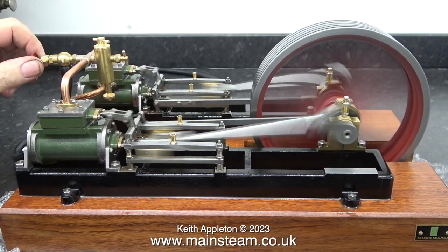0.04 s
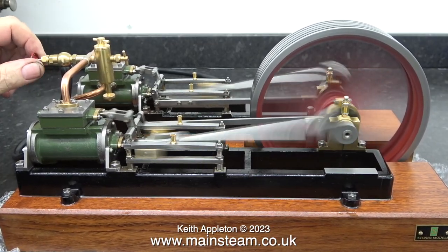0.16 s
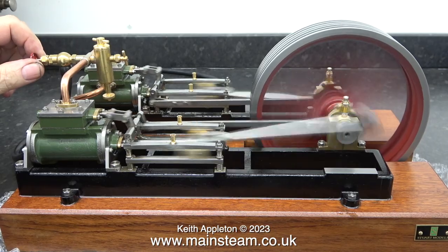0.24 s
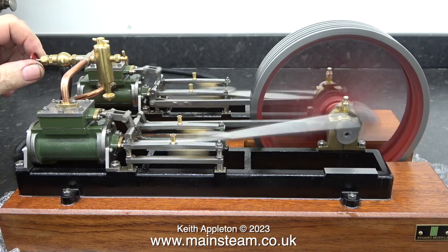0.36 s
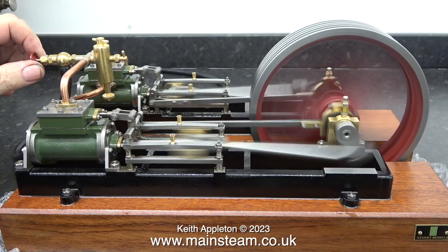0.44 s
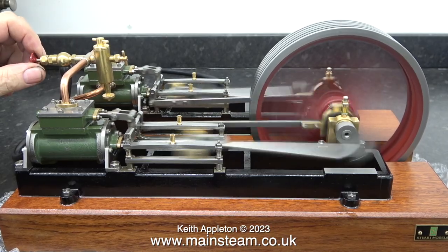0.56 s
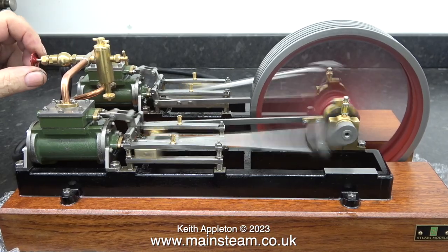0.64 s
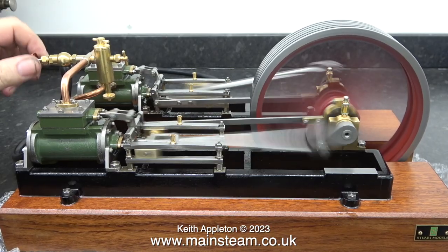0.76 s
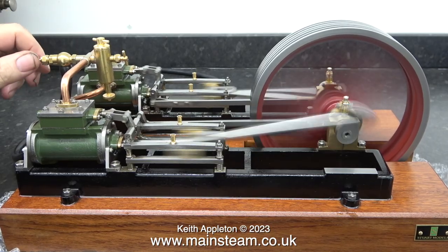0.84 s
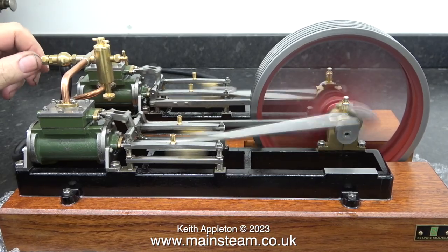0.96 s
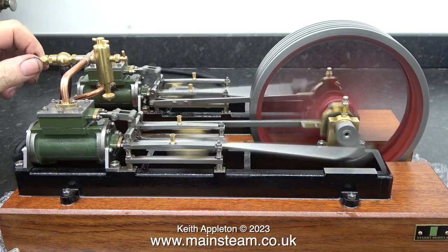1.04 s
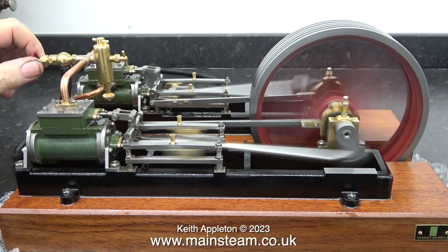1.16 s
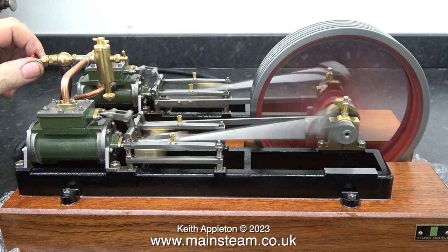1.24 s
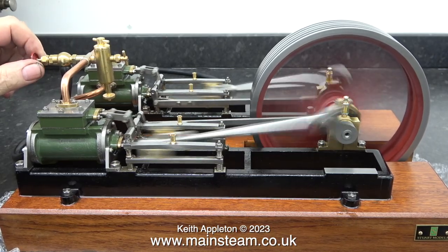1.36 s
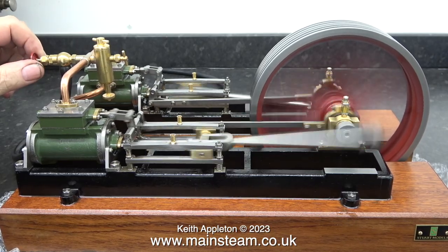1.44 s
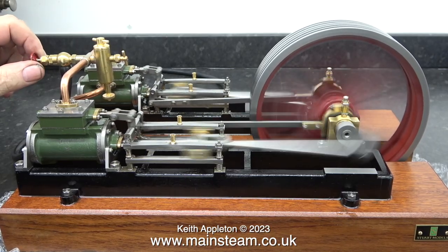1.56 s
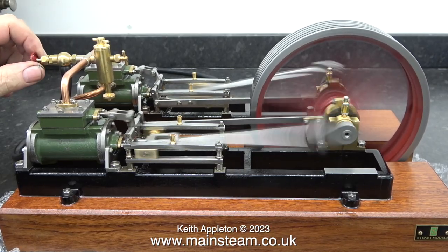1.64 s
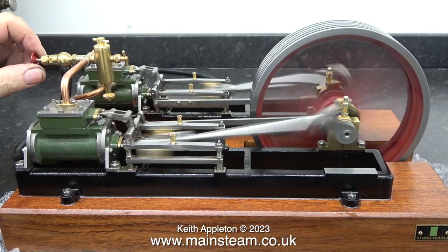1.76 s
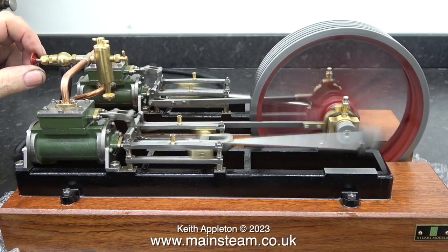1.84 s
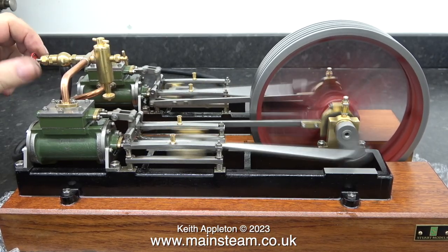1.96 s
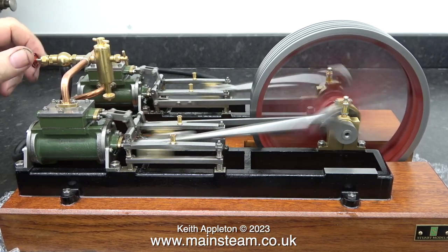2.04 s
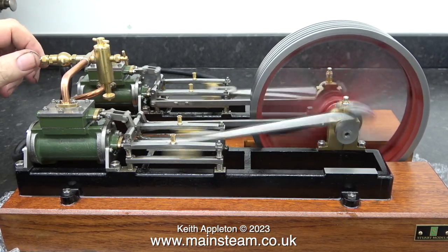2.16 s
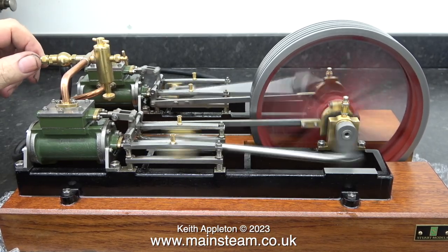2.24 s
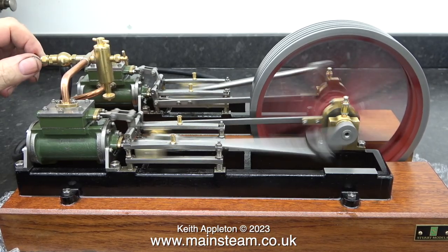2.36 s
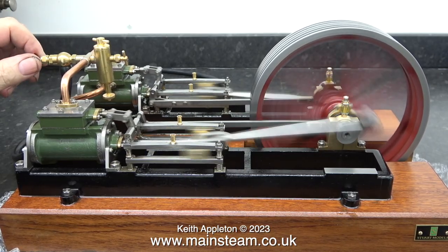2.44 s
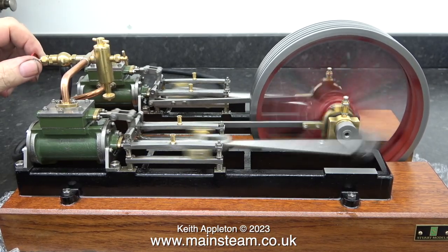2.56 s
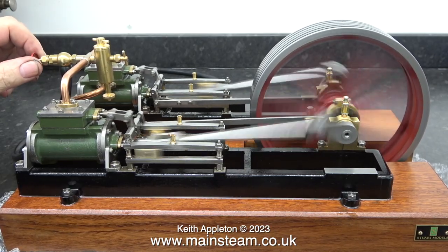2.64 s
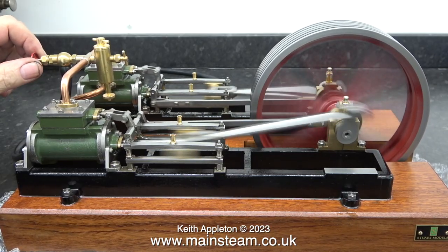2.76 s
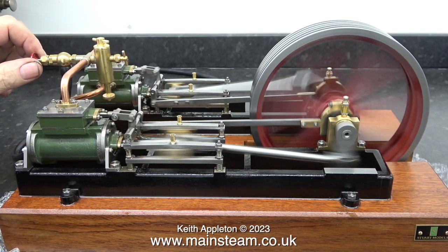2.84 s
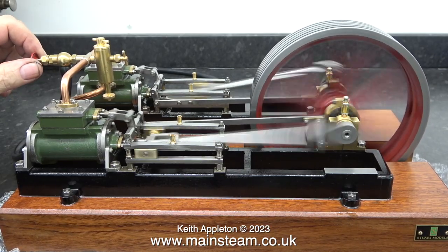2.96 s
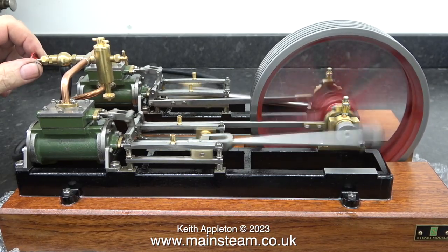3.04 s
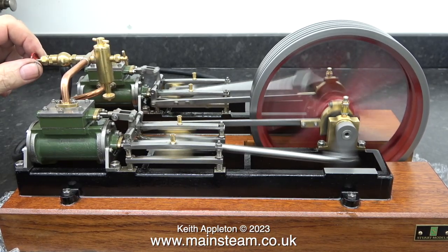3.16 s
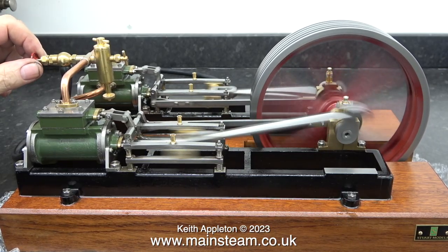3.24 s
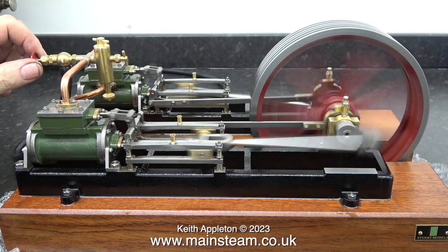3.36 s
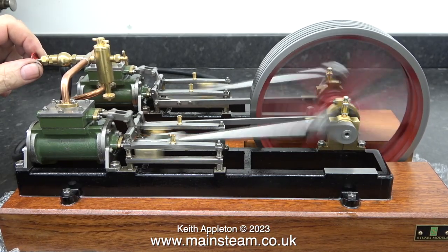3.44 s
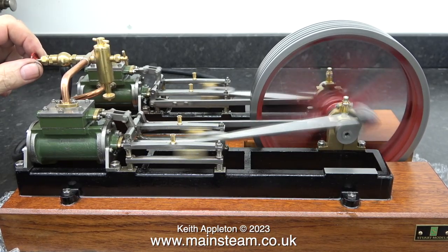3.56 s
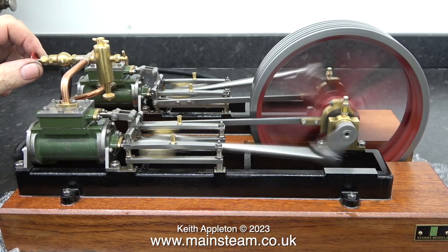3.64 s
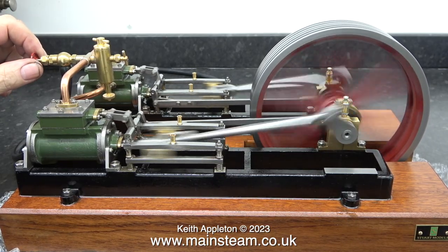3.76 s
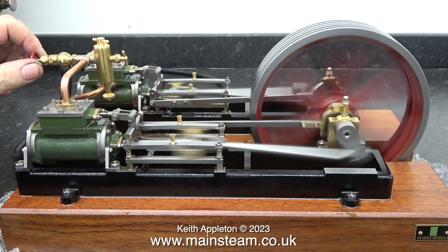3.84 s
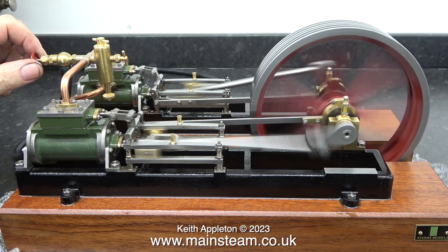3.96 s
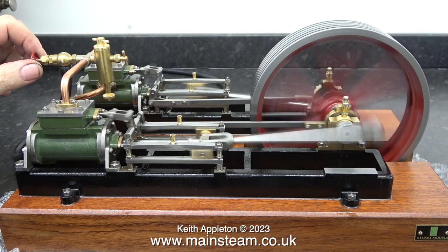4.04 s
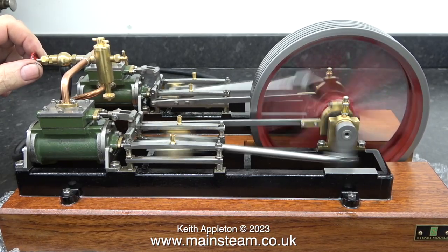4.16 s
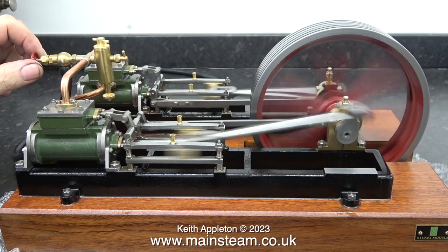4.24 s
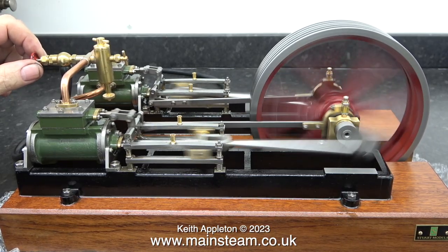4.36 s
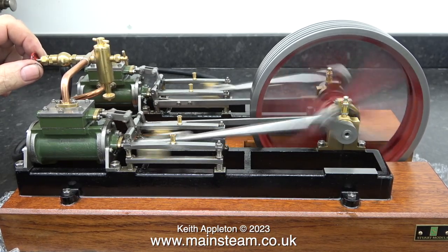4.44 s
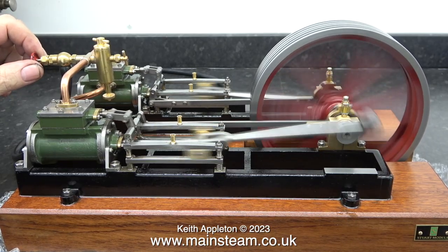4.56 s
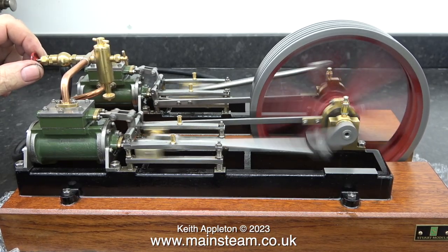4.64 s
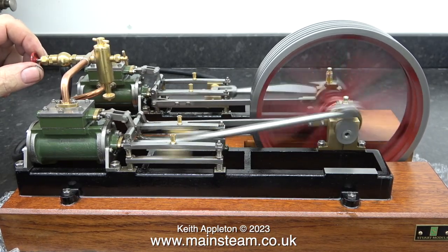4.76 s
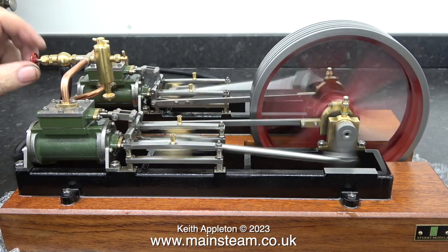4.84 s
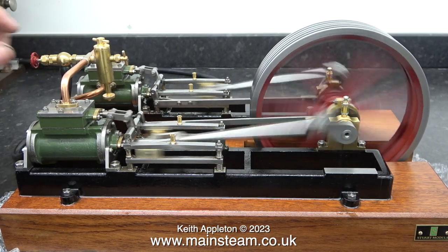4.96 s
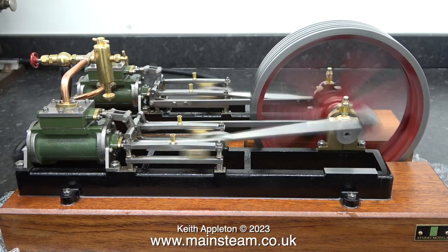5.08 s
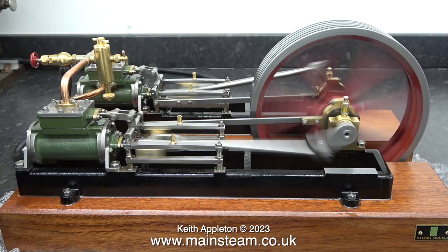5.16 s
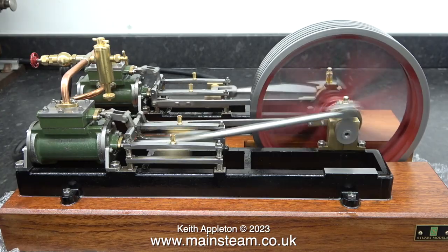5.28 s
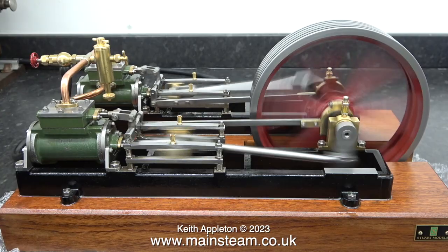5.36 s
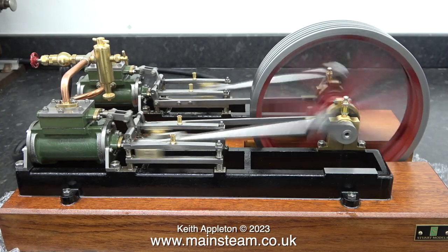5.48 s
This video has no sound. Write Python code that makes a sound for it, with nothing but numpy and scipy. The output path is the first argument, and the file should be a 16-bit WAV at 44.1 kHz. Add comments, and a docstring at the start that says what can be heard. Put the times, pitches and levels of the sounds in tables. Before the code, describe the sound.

A small twin-cylinder model engine clatters fast and metallic, bright clacks and ticks over air hiss and a low bench boom, gradually slowing.

```python
"""On a padded bench, a small twin-cylinder engine runs on compressed air and slows as the valve is closed.
Four piston reversals a turn each set off noise-like contacts for a clack, a tick and a knock; loose links
rattle and air hisses in between, ringing the same metal parts as resonant filters.
The wooden base rings from blows and rattle, the bench booms along with the shaft over a soft rumble,
and short blurred reflections come back from bench and wall."""
import sys
import numpy as np
from scipy import signal
from scipy.fft import rfft, irfft, next_fast_len
from scipy.io import wavfile
from scipy.ndimage import uniform_filter1d

SR = 44100
rng = np.random.default_rng(int(sys.argv[2]) if len(sys.argv) > 2 else 0)


def wrap_up_sound(samples):
    """Save the sound to the file named by the first command line argument, as 16-bit audio."""
    columns = np.atleast_2d(samples).T
    # keep every value between -1 and 1, then stretch to whole-number steps
    tamed = np.clip(columns, -1, 1)
    steps = np.round(tamed * 32767).astype(np.int16)
    wavfile.write(sys.argv[1], SR, steps)


def linear_from_db(decibels):
    """Turn decibels (scalar or array-like) into linear amplitude factors; 0 gives 1."""
    return 10 ** (np.asarray(decibels, float) / 20)


N = 242991
TIME = np.arange(N) / SR

# shaft speed as the valve is closed: (time [s], speed [rev/min])
SHAFT_SPEED = [(0, 526.3), (.6, 506.7), (1.2, 482.7), (1.8, 435.8), (2.4, 407.0), (3, 376.0), (3.4, 362.2),
               (4, 357.7), (4.6, 352.4), (5.51, 344.0)]
# shaft angle of the four stroke ends: (angle [turns])
END_TURNS = np.array([.21, .45, .71, .935])
# play in the joints shifts the blow at each end: (delay [ms])
PLAY_MS = [-0.69, -0.65, 0.46, 0.79]
PLAY_SPREAD_MS = 0.58  # the shift is never quite alike
# relative strength of the four ends at SLOW_RPM, before the layer gains:
# (clack [dB], ring [dB], low knock [dB], high knock [dB])
SLOW_RPM = 350
BLOW_DB = [(-43, -42, -47, -49), (-24, -29.5, -43.5, -38), (-22, -27.5, -48, -35.5),
           (-28, -32, -34.5, -40.5)]
# growth of those strengths with speed, same columns: (each [dB per 100 rev/min])
GROWTH_DB = [(11.3, 8.56, 4.5, 8.8), (3.5, 1.7, 4, 2.3), (3.67, 3.4, 4.5, 1.7), (3, 3.1, -3, 2.9)]
# random spread of those strengths, skewed towards weak blows, same columns: (each [dB])
MISS_DB = (1.1, 1.97, 2.2, 2.7)
# contacts around the four stroke ends, in turn order: (lead [ms], rise [ms], decay [ms],
# after-rattle share [dB], after-rattle decay [ms], tick pitch [Hz], tick against clack strength [dB])
STROKE_ENDS = [(5.3, 44, 11, 10, 42, 14000, -16), (0.67, 4.8, 4.1, -15, 31, 14000, -8),
               (0.69, 3.8, 4.5, -9, 22, 13760, -5), (1.1, 6.2, 8.2, -4, 38, 13600, -4)]
# running rattle between reversals, before the layer gain: (time [s], level [dB])
RUNNING_RATTLE = [(0.0, -26), (0.74, -30), (1.09, -29), (2.07, -30.5), (2.38, -30), (3.08, -31),
                  (3.93, -31), (4.25, -31.5), (5.51, -31.5)]
# rods, guides and pipes, each a cluster of close modes: (frequency [Hz], width [Hz], relative level [dB])
METAL_PARTS = [(2547, 97, -2.5), (2795, 333, -8.5), (2423, 140, -13.5), (3370, 86, -16.5), (4025, 15, -6.5),
               (4206, 284, -4.5), (4390, 230, -9), (4890, 150, -16), (5177, 246, -8.5), (6276, 157, -1.5),
               (6614, 110, -8.5), (7120, 42, -16), (7786, 300, -8), (8150, 80, -5.5), (8500, 110, -10.5),
               (9040, 140, -8.5), (9740, 220, -8.5), (10220, 210, -9), (12160, 870, -18), (12070, 360, -9),
               (14350, 320, -15), (13840, 340, -13.5), (15800, 320, -19)]
# places of the narrow modes in a cluster: (offset [widths])
CLOSE_MODES = (-.55, -.1, .4)
# air hiss under the resonances: (frequency [Hz], gain [dB])
AIR_HISS = [(600, -52), (1000, -19.5), (1500, -12.5), (2100, -16.5), (3200, -16), (5700, -11.5),
            (9000, -21), (11100, -52), (13000, -15.5), (15900, -28)]
# frame and wooden base modes: (frequency [Hz], t60 [s], lead [ms], drive by a knock [dB],
# drive by the running rattle [dB])
BASE_MODES = [(228, 0.061, 3.3, -10, -52), (335, 0.04, 2.5, -5, -45), (387.7, 0.045, 6.97, 0.5, -42.5),
              (467, 0.035, 2.4, -5.5, -40.5), (569, 0.051, 4.02, -6, -52.5), (709, 0.03, 4.94, -4, -40),
              (775, 0.032, 5.51, 1.5, -43), (1190, 0.012, 5.46, 3, -33), (1294, 0.026, 4.94, -7, -40.5)]
# bench modes: (frequency [Hz], t60 [s], then for each of the four ends lag [ms], signed push [ratio])
BENCH_MODES = [(66.7, .25, -14.0, .12, -1.25, .165, -.12, .17, -.8, .11),
               (125, .055, -4.0, .42, 3.0, .1, -3.0, .08, 4.0, .06),
               (165, .05, -8.0, .14, 3.0, .06, -3.0, .06, 2.0, -.26)]
# colour of the room and bench rumble: (frequency [Hz], gain [dB])
RUMBLE_COLOUR = [(25, -30), (50, -18), (110, -17), (200, -13), (400, -2), (900, -21)]
# scattered part, opposite in the two channels: (frequency [Hz], gain [dB])
APART_COLOUR = [(60, -34), (1000, -26), (5000, -30), (7000, -19), (9000, -11), (10500, -6), (11800, -10),
                (13000, -26)]
# share that the wall behind sends back; the padding swallows the low part: (frequency [Hz], gain [dB])
WALL_COLOUR = [(60, -30), (500, -20), (1500, -9), (16000, -9)]
# microphone's loss of deep bass: (frequency [Hz], gain [dB])
BASS_CUT = [(20, -34), (30, -22), (45, -4), (60, 0), (20000, 0)]
# tilt between the sides: (frequency [Hz], left minus right [dB])
SIDE_BALANCE = [(60, -5), (110, -2), (200, 3.5), (380, 3), (700, 6), (1290, 5.5), (2380, 3), (4400, 4),
                (8120, 2), (11000, 2.2), (15000, 1)]


def unit(x):
    """Scales a signal to rms 1."""
    return x / np.sqrt(np.mean(x ** 2))


def colour(x, points):
    """Equaliser whose gain runs through (frequency [Hz], gain [dB]) points on a log frequency axis."""
    hz, db = np.transpose(points)
    size = next_fast_len(N)
    log_hz = np.log(np.maximum(np.fft.rfftfreq(size, 1 / SR), 1))
    gain = linear_from_db(np.interp(log_hz, np.log(np.maximum(hz, 1)), db))
    return irfft(rfft(x, size) * gain, size)[:N]


def ring(x, hz, t60):
    """One decaying mode; a unit blow rings with a peak near 1."""
    w = 2 * np.pi * min(hz, .45 * SR) / SR
    r = np.exp(-np.log(1000) / (t60 * SR))
    return signal.lfilter([np.sin(w)], [1, -2 * r * np.cos(w), r * r], x)


def band(x, hz, width):
    """A mode given by its width in Hz, gain near 1 at the centre."""
    t60 = np.log(1000) / (np.pi * width)
    return 2 * np.pi * width / SR * ring(x, hz, t60)


def blows(times, size):
    """Single impulses at the given times in seconds."""
    x = np.zeros(N)
    index = np.clip((times * SR).astype(int), 0, N - 1)
    np.add.at(x, index, size * (times >= 0))
    return x


def walk(rate):
    """Random levels held 1 / rate s and slewed twice; spread near 1."""
    hold = int(SR / rate)
    steps = np.repeat(rng.standard_normal(N // hold + 1), hold)
    return 1.3 * uniform_filter1d(uniform_filter1d(steps, hold), hold)[:N]


def strokes():
    """Four piston reversals a turn: even times, blow times with joint play, end numbers, strengths."""
    rpm = np.interp(TIME, *np.transpose(SHAFT_SPEED))
    turns = np.cumsum(rpm) / 60 / SR
    angle = (np.arange(int(turns[-1]) + 1)[:, None] + END_TURNS).ravel()
    angle = angle[angle < turns[-1]]
    end = np.arange(len(angle)) % 4
    even = np.interp(angle, turns, TIME)
    late_ms = np.array(PLAY_MS)[end] + PLAY_SPREAD_MS * rng.standard_normal(len(end))
    faster = (np.interp(even, TIME, rpm)[:, None] - SLOW_RPM) / 100
    miss = np.array(MISS_DB) * (rng.exponential(size=(len(end), 4)) - 1)
    strength = np.array(BLOW_DB)[end] + np.array(GROWTH_DB)[end] * faster - miss
    return even, even + late_ms / 1000, end, strength


def power(times, db, end):
    """Power envelope of the reversals: swell, fall and longer after-rattle."""
    out = np.zeros(N)
    before, after = 1024, 4096  # samples around each reversal
    ms = np.arange(-before, after) / SR * 1000
    for k, (lead, rise, decay, share_db, rattle_decay, *_) in enumerate(STROKE_ENDS):
        share = np.clip(linear_from_db(2 * share_db), 0, 1)
        swell = np.exp(-np.abs(ms / rise) ** 1.3)
        fall = (1 - share) * np.exp(-ms / decay) + share * np.exp(-ms / rattle_decay)
        shape = np.where(ms < 0, swell, fall)
        hits = blows(times[end == k] - lead / 1000, linear_from_db(2 * db[end == k]))
        out += signal.fftconvolve(hits, shape)[before:before + N]
    return np.maximum(out, 0)  # keeps rounding from going below zero


def contacts(scatter_db):
    """Dense tiny contacts, now and then a strong one, as noise of randomly scattered level."""
    return unit(rng.standard_normal(N) * linear_from_db(scatter_db * rng.exponential(size=N)))


def metal(strength, scatter_db, flicker_db, rate):
    """Every part takes its own contacts and rings at its resonances, unevenly, over a broad hiss."""
    hits = contacts(scatter_db)
    out = colour(hits * strength, AIR_HISS)
    shifts = rng.integers(0, N, (len(METAL_PARTS), 2))  # same hits, moved in time for each part
    for (hz, width, db), (wide_shift, close_shift) in zip(METAL_PARTS, shifts):
        drive = strength * linear_from_db(db + flicker_db * walk(rate))
        out += band(drive * np.roll(hits, wide_shift), hz, width)
        close_drive = drive * np.roll(hits, close_shift)
        out += linear_from_db(-4.0) * sum(band(close_drive, hz + width * d, 52.3) for d in CLOSE_MODES)
    return out


def ticks(times, clack_db, end):
    """The valve gear rings for a few ms, highest of all, with its own pitch at each end."""
    swell = TIME[:2000] / 0.0035
    shape = swell * np.exp(1 - swell)
    out = 0
    for k, (*_, hz, db) in enumerate(STROKE_ENDS):
        hits = blows(times[end == k] - .0045, linear_from_db(clack_db[end == k] + db))
        puff = signal.fftconvolve(hits, shape)[:N]
        out = out + band(band(contacts(1.7) * puff, hz, 1100.0), hz, 1100.0)
    return out


def clatter(times, clack_db, ring_db, end, run):
    """Contacts come thick at each reversal; bright clack and lower ring have their own strength."""
    low = signal.butter(3, 5500, fs=SR, output="sos")
    high = signal.butter(3, 5500, "high", fs=SR, output="sos")
    clack = signal.sosfilt(high, metal(np.sqrt(power(times, clack_db, end)), 1.86, 1.6, 60))
    body = signal.sosfilt(low, metal(np.sqrt(power(times, ring_db, end)), 2.5, 0.96, 60))
    steady = unit(metal(linear_from_db(0.83 * walk(90)), 2.86, 1.96, 40))
    tick = ticks(times, clack_db, end)
    return linear_from_db(9.0) * clack + linear_from_db(10.5) * body + linear_from_db(7.0) * tick + linear_from_db(-4.5) * run * steady


def base(times, low_db, high_db, run):
    """Each reversal knocks the frame's modes; the running rattle keeps them murmuring."""
    chance = rng.standard_normal((len(times), 2 * len(BASE_MODES)))
    # the murmur fades more steeply than the rattle does
    shake = linear_from_db(19.5) * run ** 1.627 * rng.standard_normal(N)
    out = 0
    for k, (hz, t60, lead, db, run_db) in enumerate(BASE_MODES):
        knock_db = low_db if k < 4 else high_db
        size = linear_from_db(knock_db + db + 2.5 * chance[:, 2 * k])
        push = blows(times - lead / 1000 + 0.00067 * chance[:, 2 * k + 1], size)
        # the blow arrives through the casting, so the mode swells over a few swings
        push = band(push, hz, 0.2 * hz)
        murmur = linear_from_db(run_db) * np.roll(shake, 5000 * k)
        out = out + ring(push + murmur, hz, t60)
    return out


def bench(even, end, run):
    """The flywheel evens the shaft's motion, so the bench is pushed the same way on every turn."""
    out = linear_from_db(-32) * unit(colour(rng.standard_normal(N), RUMBLE_COLOUR))
    for hz, t60, *push in BENCH_MODES:
        lag_ms, size = np.reshape(push, (4, 2))[end].T
        out = out + ring(blows(even + lag_ms / 1000, size), hz, t60)
    # the inertia load falls less than the rattle as the engine slows
    return linear_from_db(-5.5) * run ** 0.75 * out


def scattered(near):
    """Scattered reflections off bench and wall, as a decaying noise blur, reach the sides unalike."""
    blur = rng.standard_normal(3000) * np.exp(-TIME[:3000] / .012)
    return colour(signal.fftconvolve(near, blur / np.linalg.norm(blur))[:N], APART_COLOUR)


def wall_return(near):
    """The wall behind sends back a short blur that softens the clacks and roughens the spectrum."""
    t = TIME[:6000]
    blur = rng.standard_normal(6000) * np.exp(-t / .022) * (t > .002)
    return colour(signal.fftconvolve(near, blur / np.linalg.norm(blur))[:N], WALL_COLOUR)


def scene():
    """Engine close to the microphones: clatter, base and bench with their reflections, in stereo."""
    even, times, end, strength = strokes()
    clack_db, ring_db, low_db, high_db = strength.T
    run = linear_from_db(np.interp(TIME, *np.transpose(RUNNING_RATTLE)))
    near = clatter(times, clack_db, ring_db, end, run)
    near = near + base(times, low_db, high_db, run)
    near = near + bench(even, end, run)
    apart = scattered(near)
    near = near + wall_return(near)
    return np.array([near + apart, near - apart])


def band_limit(x):
    """A steep low-pass at the top of the band."""
    return signal.sosfilt(signal.butter(12, 15920, fs=SR, output="sos"), x)


def record(dry):
    """The left side hears more middle, the right more bass; deep bass and the top are cut."""
    sides = []
    for x, sign in zip(dry, (1, -1)):
        tilt = [(hz, sign * db / 2) for hz, db in SIDE_BALANCE]
        sides.append(colour(colour(x, BASS_CUT), tilt))
    top_cut = signal.ellip(12, .3, 80, 15720, fs=SR, output="sos")
    mix = signal.sosfilt(top_cut, sides)
    return band_limit(mix)


dry = scene()
out = record(dry)
wrap_up_sound(out)
```